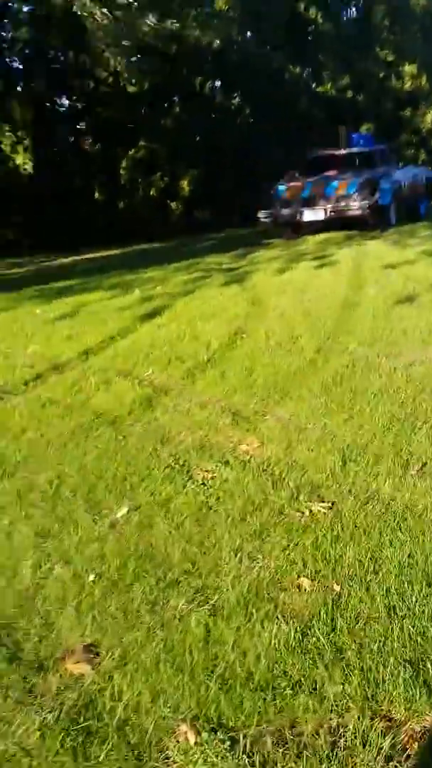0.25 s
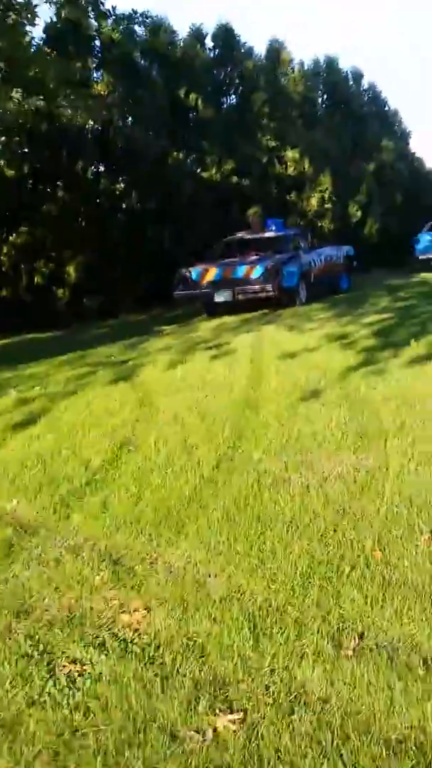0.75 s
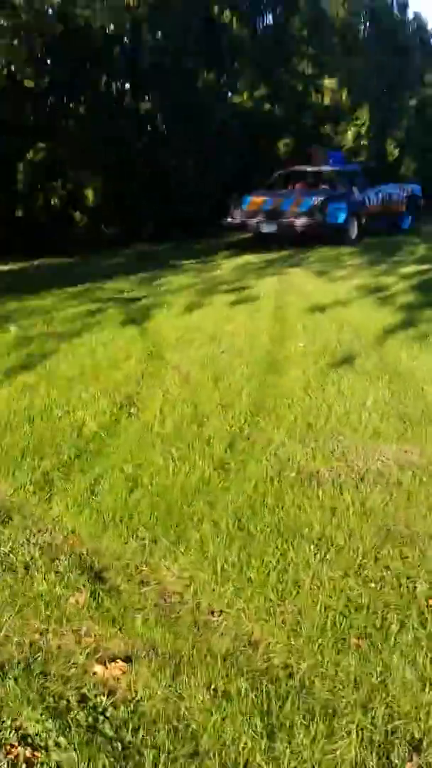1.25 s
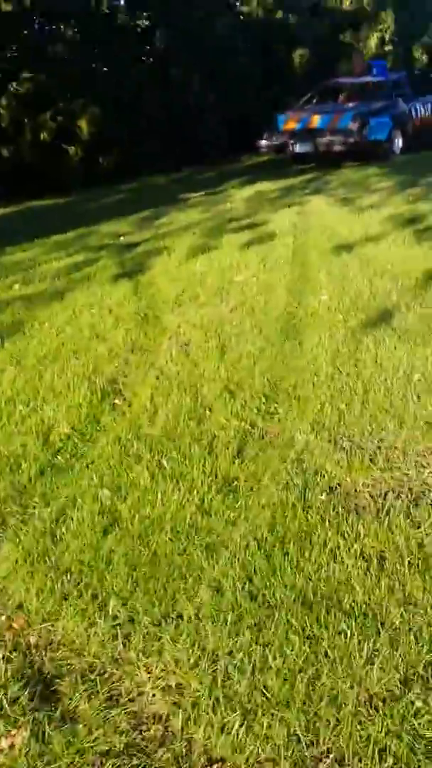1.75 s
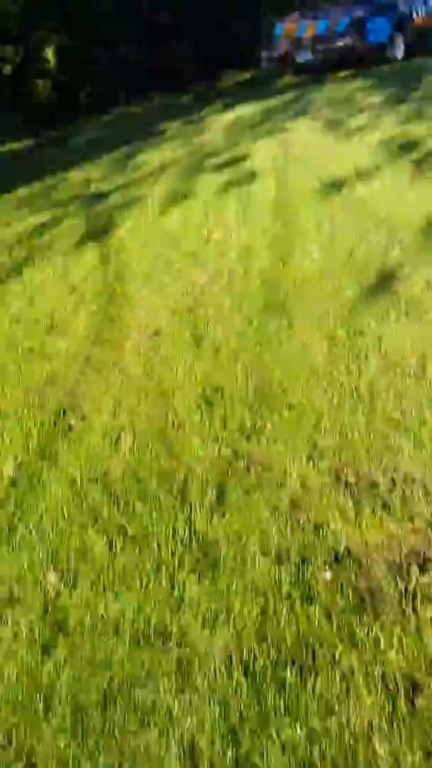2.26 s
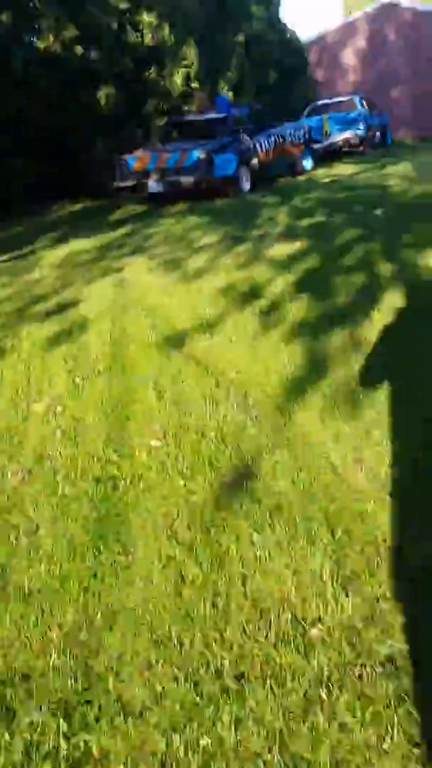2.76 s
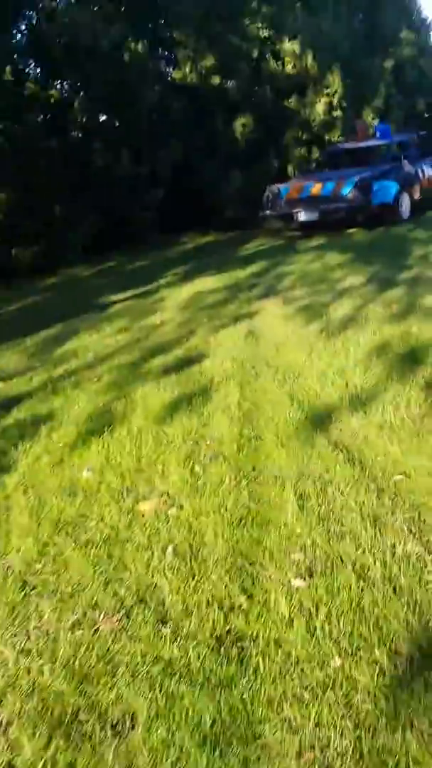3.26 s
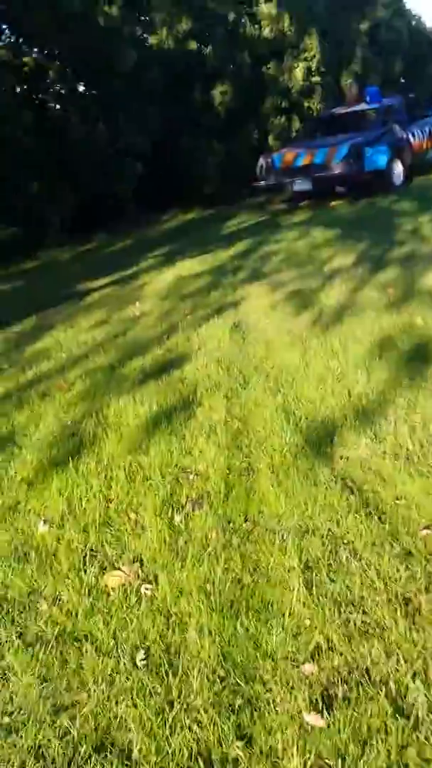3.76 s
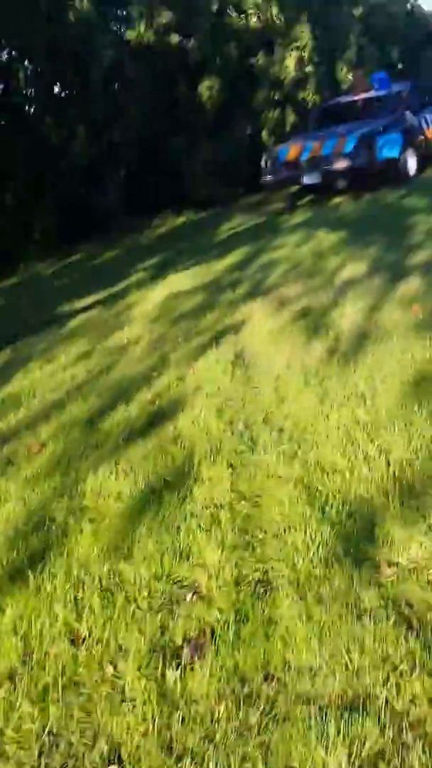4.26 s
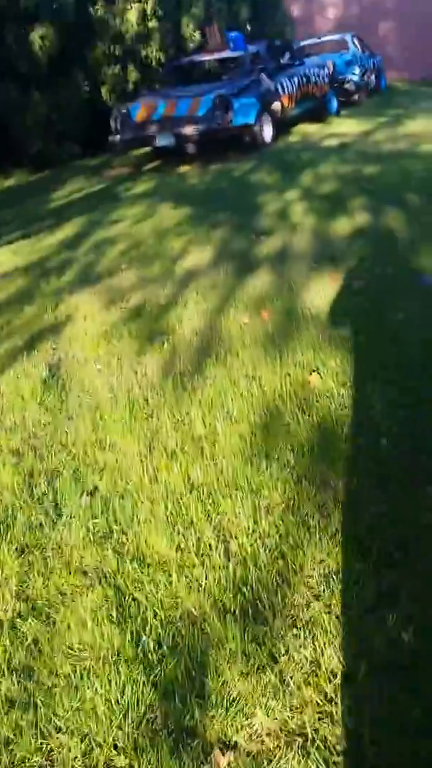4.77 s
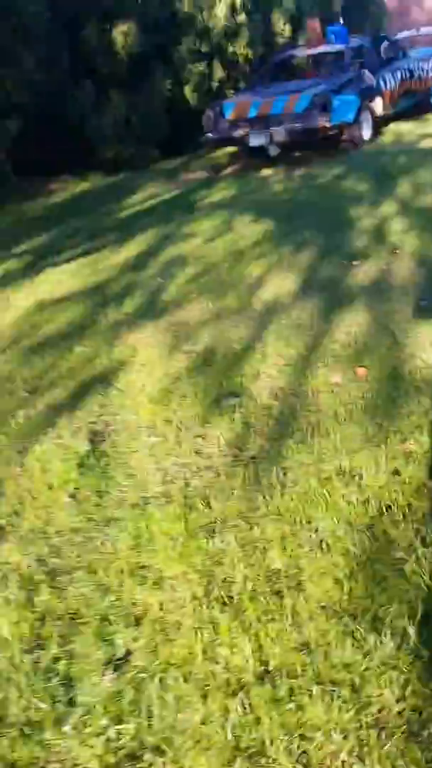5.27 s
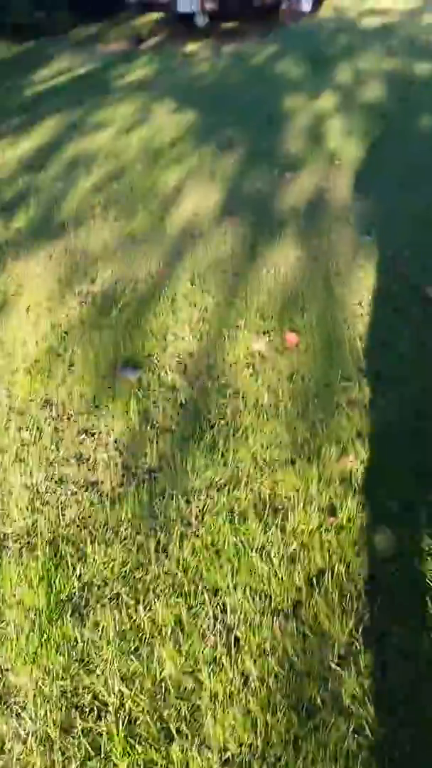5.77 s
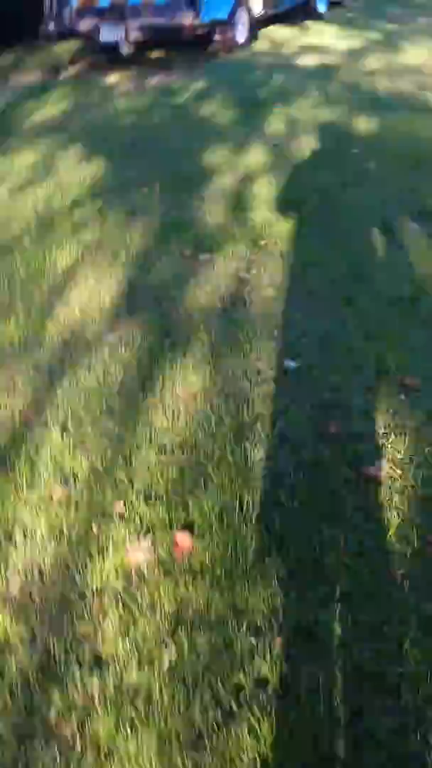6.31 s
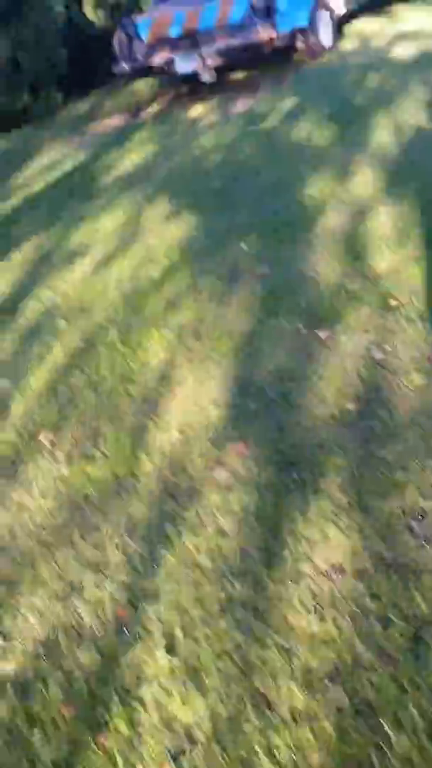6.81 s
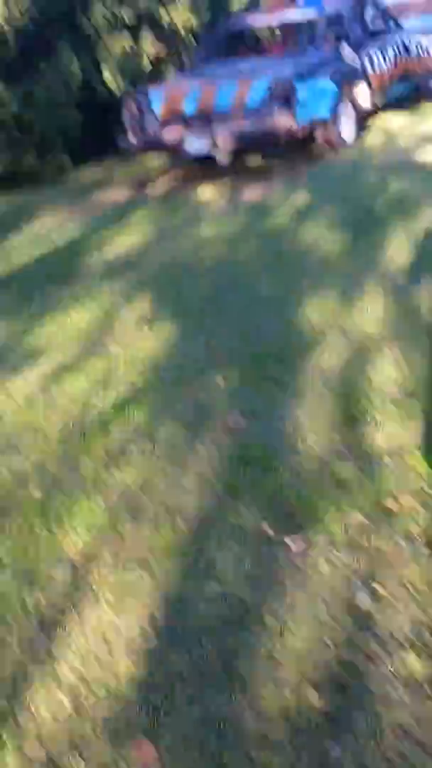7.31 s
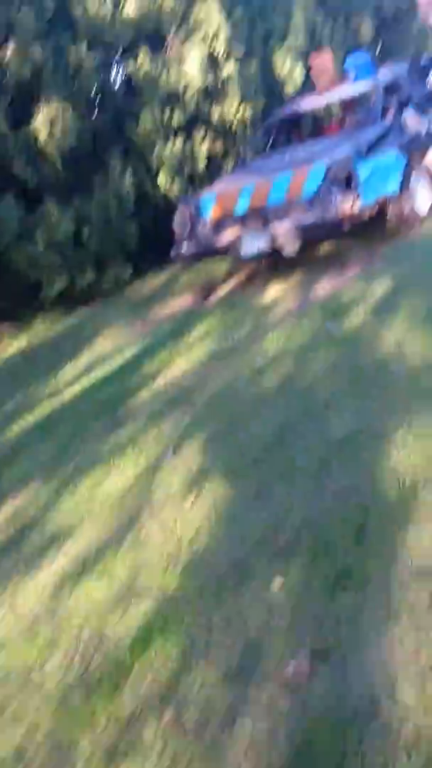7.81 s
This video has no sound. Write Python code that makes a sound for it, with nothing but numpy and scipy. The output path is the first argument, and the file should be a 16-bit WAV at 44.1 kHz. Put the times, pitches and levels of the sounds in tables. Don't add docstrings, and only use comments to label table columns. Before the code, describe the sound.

Lumpy, loud car idle outdoors: fast limping thumps, a constant gassy hiss and irregular exhaust pops, growing deeper and barkier with the approach.

```python
import sys
import numpy as np
from scipy import signal
from scipy.fft import rfft, irfft, next_fast_len
from scipy.io import wavfile
from scipy.ndimage import uniform_filter1d

SR = 44100
rng = np.random.default_rng(int(sys.argv[2]) if len(sys.argv) > 2 else 0)


def wrap_up_sound(samples):
    columns = np.atleast_2d(samples).T
    tamed = np.clip(columns, -1, 1)
    steps = np.round(tamed * 32767).astype(np.int16)
    wavfile.write(sys.argv[1], SR, steps)


def field_ratio(decibels):
    return 10 ** (np.asarray(decibels, dtype=float) / 20)


N = 355005


def along(table, hz):
    f, value = np.transpose(table)
    return np.interp(np.log(hz + 1), np.log(f), value)


def follow(table, t):
    times, *columns = np.transpose(table)
    return [np.interp(t, times, column) for column in columns]


def shaped(x, gain):
    size = next_fast_len(N + SR // 4)
    hz = np.arange(size // 2 + 1) * SR / size
    return irfft(rfft(x, size) * gain(hz), size)[..., :N]


def ring(hz, centre_hz, width_hz):
    return 1j * hz * width_hz / (centre_hz ** 2 - hz ** 2 + 1j * hz * width_hz)


def lowpass(corner_hz):
    return lambda hz: 1 / (1 + (hz / corner_hz) ** 6)


def walk(rate):
    hold = int(SR / rate)
    steps = np.repeat(rng.standard_normal(N // hold + 1), hold)
    return 1.3 * uniform_filter1d(uniform_filter1d(steps, hold), hold)[:N]


def train(seconds, sizes):
    at = np.clip(np.round(seconds * SR).astype(int), 0, N - 1)
    return np.bincount(at, sizes, N)


def bump(clicks, rise_ms, fall_ms):
    def smear(hz):
        bell = np.exp(-.5 * (2 * np.pi * hz * rise_ms / 1000) ** 2)
        return bell / (1 + 2j * np.pi * hz * fall_ms / 1000)
    return shaped(clicks, smear) * SR * (2.5 * rise_ms + fall_ms) / 1000


def at_rms(x, db):
    return x * field_ratio(db) / np.sqrt(np.mean(x ** 2))


def crankshaft(t):
    # t/s, firing rate [firings/s]
    firing = [(0.0, 50.65), (0.84, 48.7), (1.179, 49.9), (2.003, 44.92), (2.337, 47.37), (2.766, 41.54),
              (3.093, 45.73), (3.534, 43.66), (4.029, 44.4), (4.543, 41.64), (4.829, 45.01), (5.199, 42.64),
              (5.571, 44.27), (5.834, 41.8), (6.88, 42.61), (7.166, 46.18), (7.578, 40.65), (8.05, 46.19)]
    rate, = follow(firing, t)
    phase = .19 + np.cumsum(rate) / SR
    count = np.arange(int(phase[-1]) + 1)
    return rate, np.interp(count, phase, t), count % 8


def thump(when, cylinder, deep_db):
    # thump level/dB, thump lag [ms]
    cylinders = [(-0.5, 5.43), (0, 6.88), (0, 5.88), (-2, 8.6), (0.5, 7.85), (0, 6.26), (-1, 6.97),
                 (1.5, 6.67)]
    # f/Hz, width [Hz], level/dB, scatter between firings [dB], timing scatter [ms]
    pipes = [(47, 36, -16, 2, .6), (92, 37, 0, 1.5, 0.55), (113.7, 30, -8.5, 3.5, 1.5),
             (130, 30, -10.5, 3.5, 1.1), (168, 60, -19, 4.5, 1.38)]
    pipe_lags_ms = [-3, 0, 1.6, 3.7, 3.7]
    soft_ms = 0.59
    thump_db, thump_lag_ms = np.array(cylinders, float)[cylinder].T
    answers = []
    for (f, width, db, scatter_db, jitter_ms), lag_ms in zip(pipes, pipe_lags_ms):
        chance = rng.standard_normal((2, len(when)))
        late_ms = thump_lag_ms + lag_ms + jitter_ms * chance[0]
        pulses = train(when + late_ms / 1000, field_ratio(db + thump_db + scatter_db * chance[1]))

        def pipe(hz):
            return ring(hz, f, width) ** 2 * np.exp(-.5 * (2 * np.pi * hz * soft_ms / 1000) ** 2)
        answers.append(shaped(pulses, pipe))
    return at_rms(sum(answers[1:]), 0) + at_rms(answers[0], 0) * field_ratio(deep_db)


def gas_flow(when, cylinder, gas_db, jet_db):
    # hiss puff level/dB, bark puff level/dB, trail over the jet [dB]
    puff_levels = [(-6.5, -4, -10), (-4, -6.5, -8), (-6.5, -5, -9), (-4, -5, -16), (-2.5, -5.5, -8),
                   (-6.5, -3.5, -11), (-4, -2.5, -14), (-3.5, -2.5, -7)]
    # t/s, peak level/dB
    pops = [(0.2927, -14), (1.041, -7), (1.3054, -4), (1.5296, -12), (1.6994, 0), (1.8728, -1), (1.94, -5),
            (1.9834, -9), (2.052, -14), (2.225, -9), (2.394, -3), (2.7576, -4), (2.877, -16), (2.9236, -8),
            (2.945, -6), (3.099, -15), (3.1208, -18), (3.479, -18), (3.6636, -1), (3.8446, -2),
            (4.0244, -5), (4.4662, -17), (4.9257, -14), (5.202, -22), (5.25, -12), (5.319, -2),
            (5.4807, -6), (5.503, -11), (5.6607, -4), (5.685, -8), (5.8028, -16), (5.8518, 0), (5.8743, -8),
            (6.065, -1), (6.1865, -14), (6.2322, 1), (6.2573, -2), (6.304, -9), (6.328, -8), (6.3735, -20),
            (6.4443, -15), (6.634, -4), (6.7503, -15), (6.8219, -13), (6.8697, -14), (6.8944, -18),
            (6.9848, -4), (7.006, -8), (7.074, -11), (7.162, 4), (7.184, 0), (7.3612, -10), (7.433, -13),
            (7.5535, -7), (7.6005, -3), (7.6262, -17), (7.745, -4), (7.817, -19), (7.9266, -3),
            (7.996, -16)]
    scatter_db = np.array([[2.], [1.8], [2.5]])
    chance = rng.standard_normal((3, len(when)))
    hiss_db, bark_db, trail_db = np.array(puff_levels)[cylinder].T + scatter_db * chance
    pop_s, pop_db = np.transpose(pops)
    when = when.copy()
    when[abs(when - pop_s[:, None] - .003).argmin(axis=1)] = pop_s + .003
    puffs = bump(np.array([train(when - .0016, field_ratio(db - 2.8)) for db in (hiss_db, bark_db)]), 2.1, .7)
    crack_db = np.minimum(pop_db, 0) - 23.5 - gas_db[(pop_s * SR).astype(int)]
    cracks = bump(train(pop_s + .0008, field_ratio(crack_db)), .85, 1.1)
    lull = bump(train(pop_s - .006, 0 * pop_s + .45), 3, .5)
    trail = bump(train(when + .006, field_ratio(trail_db)), 4, 7)
    flicker_db = 0.7 * walk(11) + 0.34 * walk(60)
    jet = (1 + trail) * np.clip(1 - lull, .2, 1) * field_ratio(jet_db + flicker_db)
    return puffs + cracks * field_ratio([[0], [-4]]) + jet


def ports(flows):
    # f/Hz, slope-free level/dB
    left_colour = [(150, -39), (300, -15.5), (620, -26), (880, -11.5), (1080, -13.5), (1300, -13),
                   (1900, -11), (2800, -3.5), (4500, -2), (5900, 2.5), (7500, -7.5), (10000, -21.5),
                   (14000, -44), (15000, -62), (15600, -62)]
    right_colour = [(60, -28), (160, -23), (300, -23), (480, -24), (660, -19.5), (850, -10.5),
                    (1050, -15.5), (1300, -12.5), (1900, -13), (2800, -6.5), (5000, -8), (7500, -2.5),
                    (10000, -13), (14000, -20), (15000, -24), (15600, -31)]
    # f/Hz, share [0-1]
    alike = [(200, 1), (400, 1), (600, 0.7), (900, 1), (1200, 0.9), (1800, .5), (3000, 0.52), (5000, 0.45),
             (8000, .1)]
    left_lag = 8.3
    noise = rng.standard_normal((3, N))
    hiss, bark = flows[0] * noise, flows[1] * noise
    air = abs(flows[0]) ** 0.6 * noise
    mix = hiss + shaped(bark - hiss, lowpass(2440))
    mix += shaped(air - hiss, lambda hz: 1 - lowpass(8400)(hz))
    mix += shaped(air - bark, lowpass(450))
    shared, left, right = mix

    def share(hz):
        return np.clip(along(alike, hz), 0, 1)

    def colour(hz):
        return field_ratio(np.array([along(left_colour, hz), along(right_colour, hz)]))

    def delay(hz):
        return np.exp(-2j * np.pi * hz * left_lag / SR * np.array([[1], [0]]))
    both = shaped(shared, lambda hz: np.sqrt(share(hz)) * delay(hz) * colour(hz))
    return both + shaped(np.array([left, right]), lambda hz: np.sqrt(1 - share(hz)) * colour(hz))


def eddies(gas, zones_db, lag):
    zones_hz = [330, 830, 1600, 3200]
    blotch_db, blotch_hz, shared = 3, 200, 0.43
    hz, s, spectrum = signal.stft(gas, SR, nperseg=512)
    at = np.minimum((s * SR).astype(int), N - 1)
    field = rng.standard_normal((3, len(hz), len(s)))
    bins = int(blotch_hz * 512 / SR) | 1
    field = uniform_filter1d(uniform_filter1d(field, bins, axis=1), size=5, axis=2) * np.sqrt(5 * bins)
    blotches = shared * field[0] + np.sqrt(1 - shared ** 2) * field[1:]
    rows = [zone[at] for zone in zones_db] + [0 * s]
    weights = [np.interp(np.log(hz + 1), np.log(zones_hz), one) for one in np.eye(len(rows))]
    tone_db = np.transpose(weights) @ rows + blotch_db * blotches
    late = np.exp(-2j * np.pi * np.outer(hz, lag[at]) / SR) ** np.array([[[1]], [[0]]])
    return signal.istft(spectrum * field_ratio(tone_db) * late, SR, nperseg=512)[1][:, :N]


def wind(t):
    # t/s, length [s], level/dB
    gusts = [
        (5.526, 0.14, -33.5),
    ]
    swell = sum(field_ratio(db) * np.exp(-((t - s) / (length / 2)) ** 4) for s, length, db in gusts)
    rumble = shaped(rng.standard_normal(N), lambda hz: ring(hz, 210, 220) ** 2)
    return swell * at_rms(rumble, 0)


def scene():
    # level/dB at idle, dB per extra firing/s, dB per firing/s of surge,
    # dB per s of approach, wander [dB]
    thump_law = (-22.5, 0.39, -0.9, 0.1949, 1.17)
    deep_law = (-28.5, 1.2, .3, 0.93, 1)
    gas_law = (-22, 0.2743, 0.14, 0, 0.95)
    jet_law = (-6.8, .1, .7, -.85, .3)
    growl_law = (3.5, 0.54, -0.4, -0.59, -0.66)
    bark_law = (-4.5, 0.9, -1.4, 1.38, 0.5)
    rasp_law = (1.05, -0.016, 0.34, -0.033, 1.54)
    # t/s, load level/dB, facing level/dB
    effort = [(0, -2.5, 1), (.6, 3, -1.6), (1.3, -0.5, 2), (1.9, -3.5, 0.5), (2.2, -2.5, -2.5),
              (2.75, -0.5, 0.5), (3.2, -2.5, 5), (3.65, -4, -0.3), (4.05, -0.5, 0.5), (4.6, -3, 2.1),
              (5.1, -0.5, 3), (5.4, -2, 0.5), (6.0, 4.5, 4), (6.25, -2, -1.5), (6.55, -0.5, 2.5),
              (6.8, -5, 1.5), (7.5, 0.5, 0), (8.05, -7, 0.5)]
    # t/s, left over right level/dB, extra lag of the left port [samples]
    turn = [(0, -1, -1.5), (.7, 0.9, -2.5), (1.3, -0.5, -1.5), (1.7, .4, 0), (2.25, 1.2, -0.2), (2.8, 1, 0),
            (3.25, 0.5, -0.5), (3.8, 1.8, 0), (4.3, 2.3, 0.3), (4.9, 0.8, 0.6), (5.4, 1, -.6),
            (5.8, 1, 1.3), (6.3, 0.9, -.4), (6.8, 1, 0.7), (7.3, 0.5, 0), (8.05, 0.5, -.3)]
    t = np.arange(N) / SR
    rate, when, cylinder = crankshaft(t)
    surge = rate - uniform_filter1d(rate, int(.8 * SR), mode="nearest")
    load_db, facing_db = follow(effort, t)
    turn_db, lag = follow(turn, t)

    def level(law):
        idle_db, speed_db, surge_db, near_db, wander_db = law
        engine_db = idle_db + speed_db * (rate - 44) + surge_db * surge
        return engine_db + near_db * t + wander_db * walk(9)

    low = thump(when, cylinder, level(deep_law) - 0.69 * load_db)
    low = low * field_ratio(level(thump_law) + 0.57 * load_db)
    gas_db = level(gas_law) + 0.38 * facing_db
    growl_db = level(growl_law) + 0.45 * facing_db
    bark_db = level(bark_law) + 0.48 * facing_db
    rasp_db = level(rasp_law) + 0.61 * facing_db
    gas = ports(gas_flow(when, cylinder, gas_db, level(jet_law)))
    gas /= np.sqrt(uniform_filter1d(np.mean(gas ** 2, axis=0), SR // 5))
    port_db = gas_db + turn_db * np.array([[.5], [-.5]]) + 2.0
    gas = field_ratio(port_db) * eddies(gas, [growl_db, bark_db, rasp_db], lag)
    return np.array([np.roll(low, shift=4), low]) + gas + wind(t)


def low_pass(x):
    return signal.sosfilt(signal.butter(12, 15800, fs=SR, output="sos"), x)


def record(dry):
    rounded = np.tanh(1.1 * dry) / 1.1
    return low_pass(rounded)


dry = scene()
out = record(dry)
wrap_up_sound(out)
```